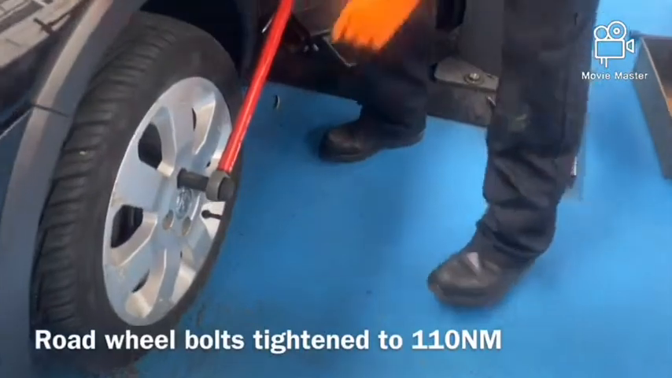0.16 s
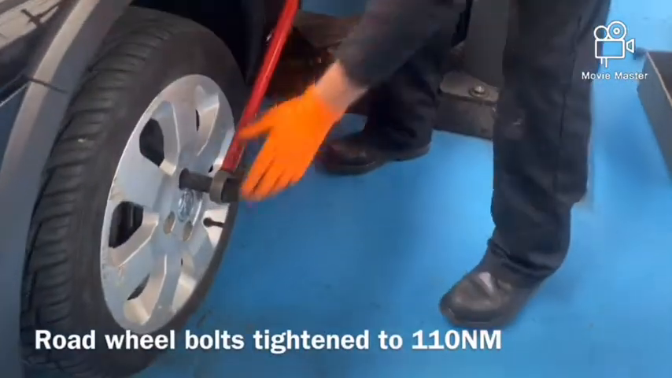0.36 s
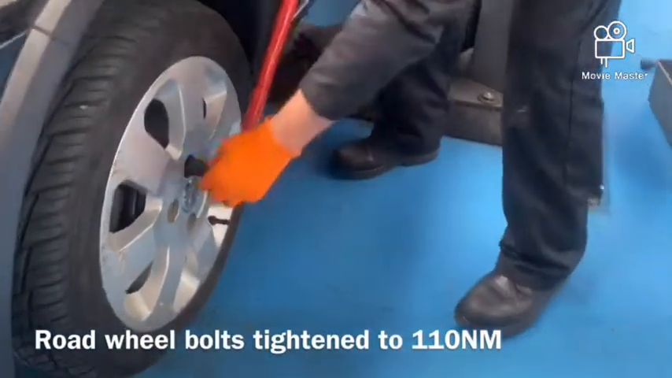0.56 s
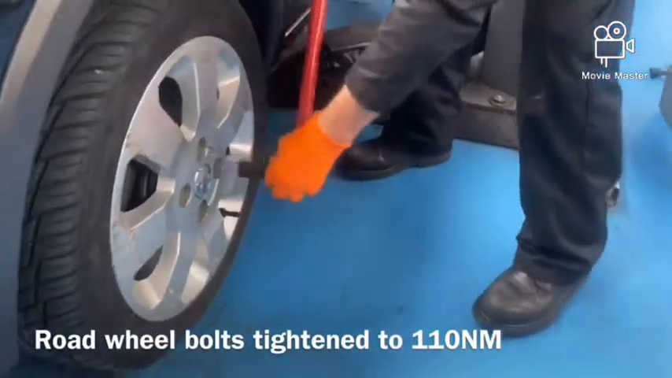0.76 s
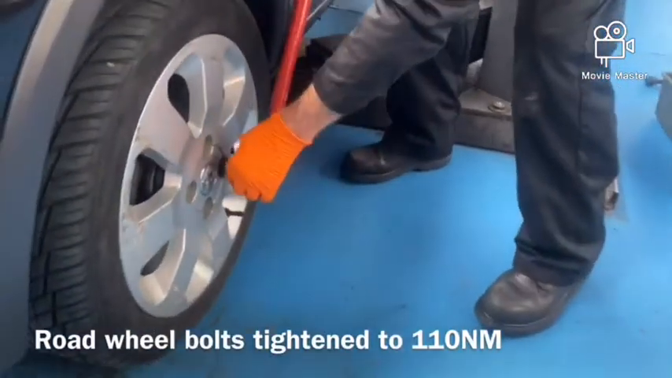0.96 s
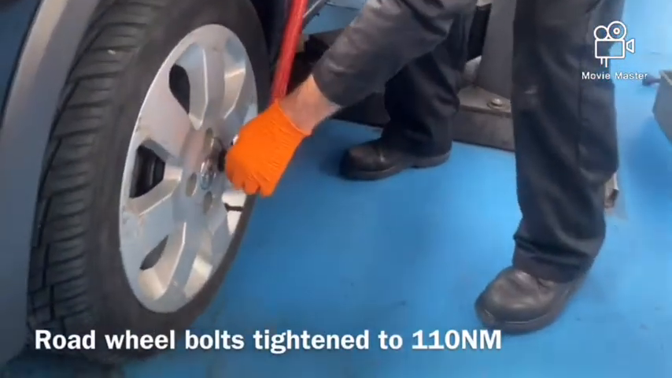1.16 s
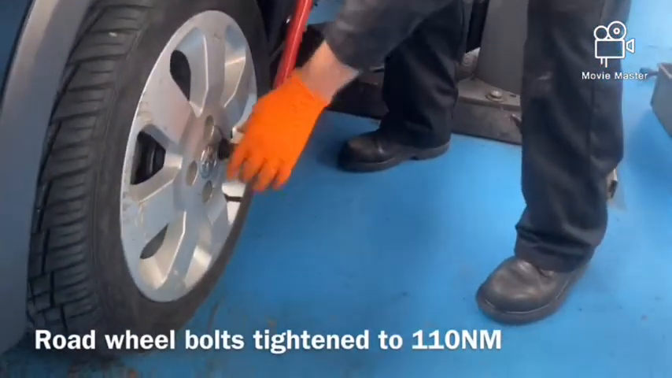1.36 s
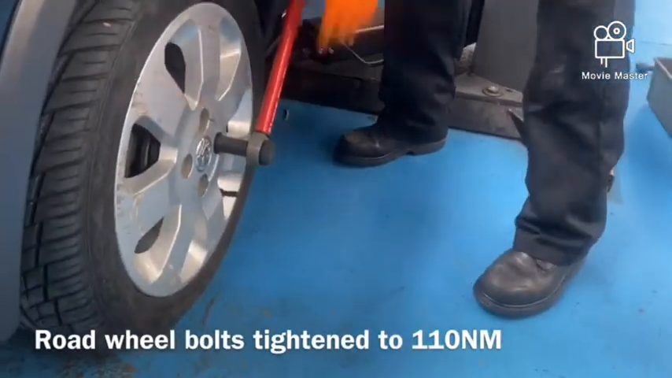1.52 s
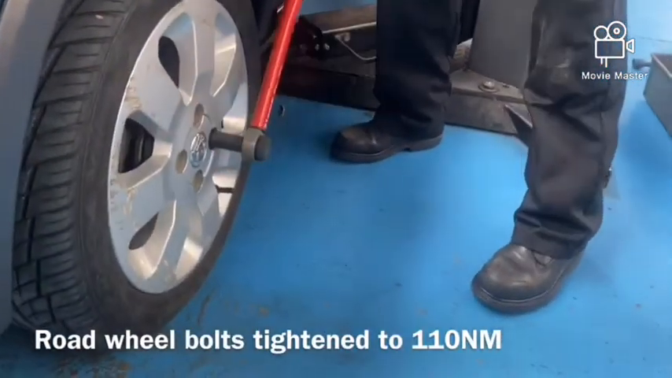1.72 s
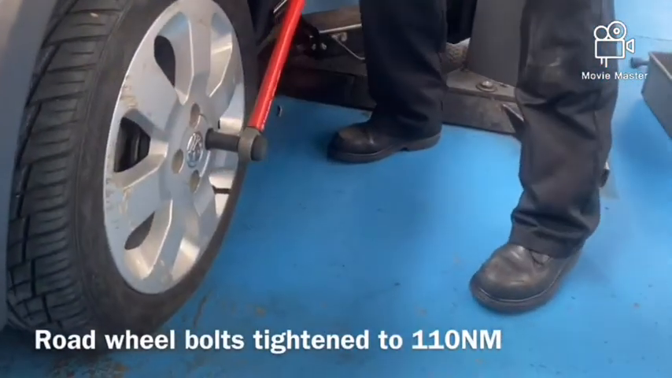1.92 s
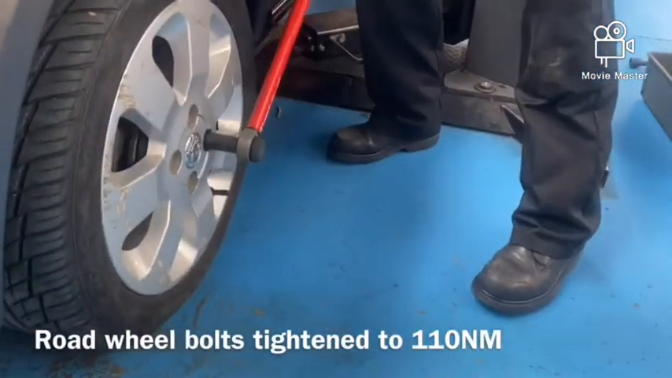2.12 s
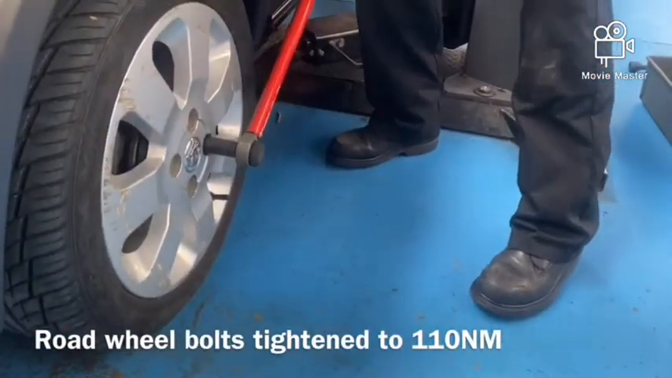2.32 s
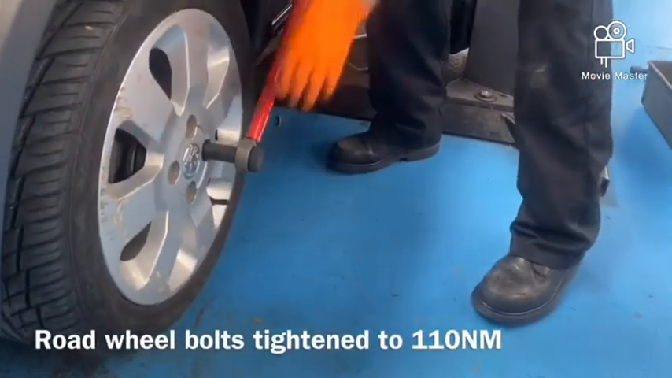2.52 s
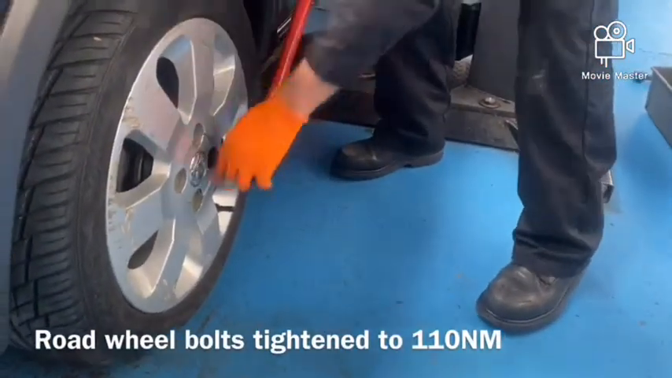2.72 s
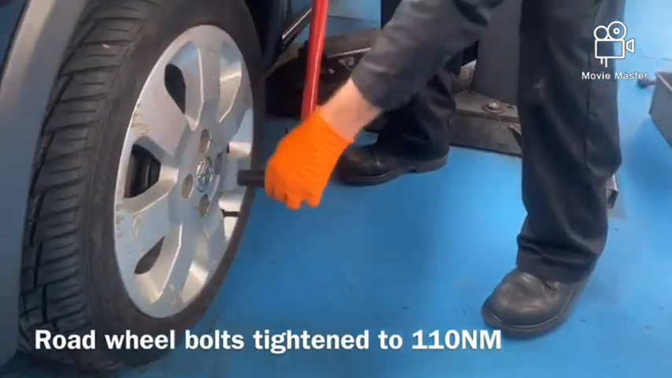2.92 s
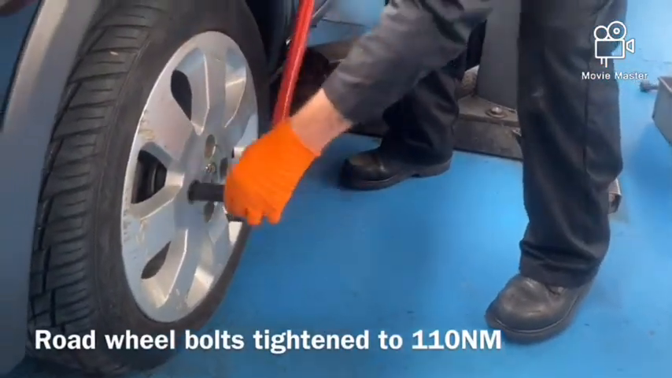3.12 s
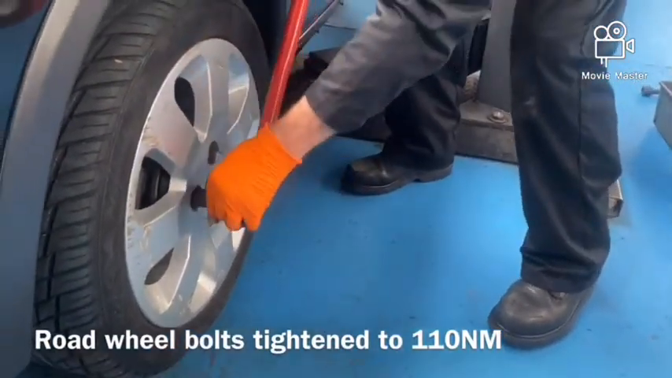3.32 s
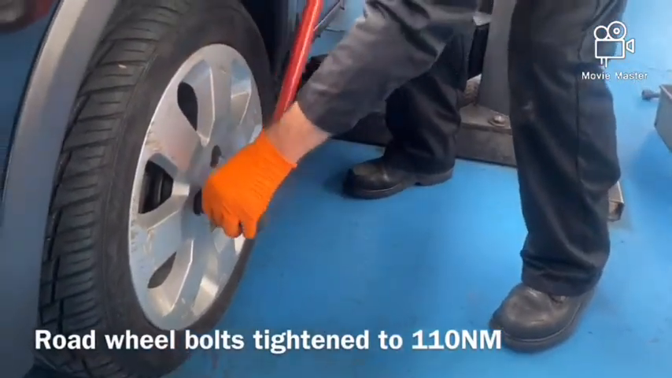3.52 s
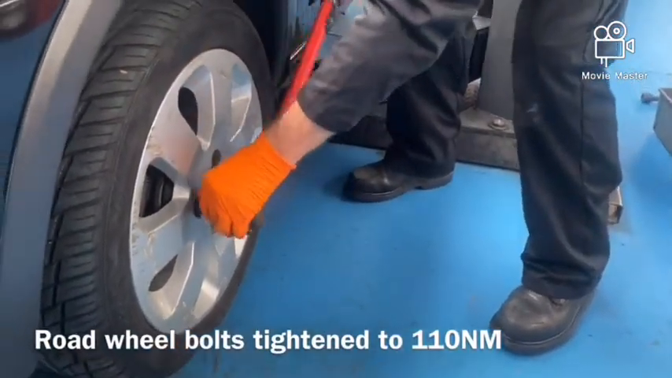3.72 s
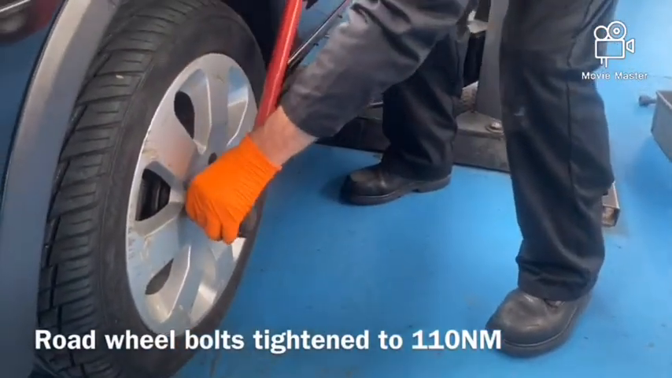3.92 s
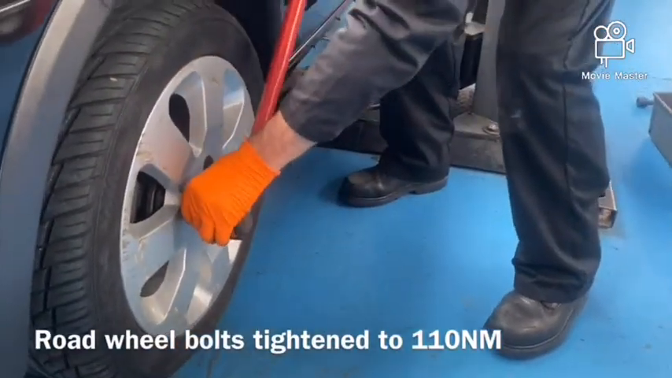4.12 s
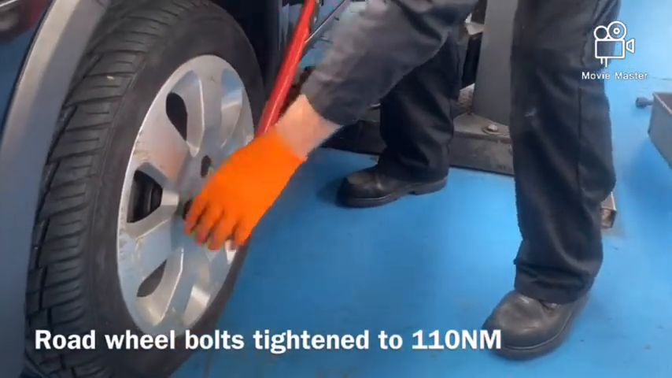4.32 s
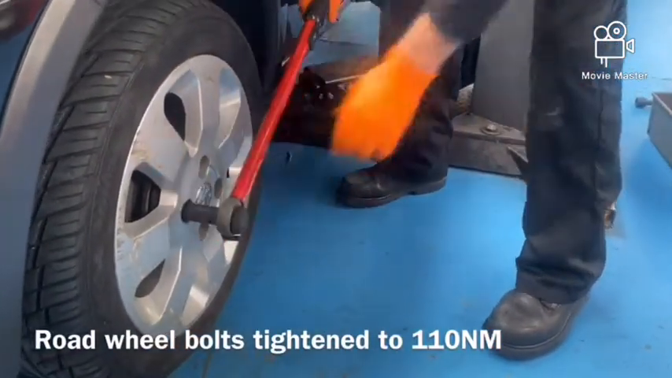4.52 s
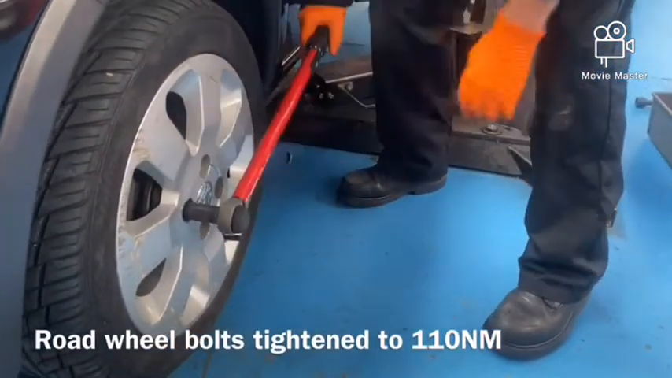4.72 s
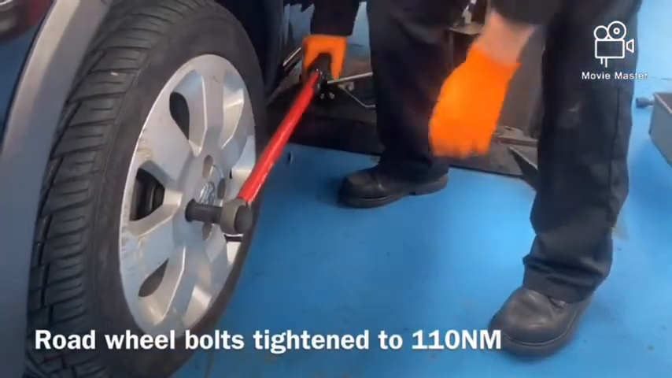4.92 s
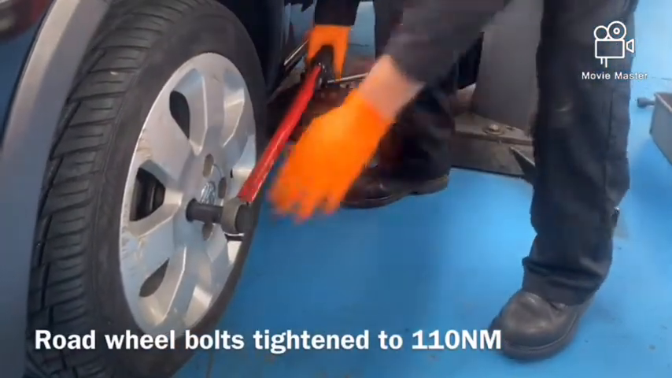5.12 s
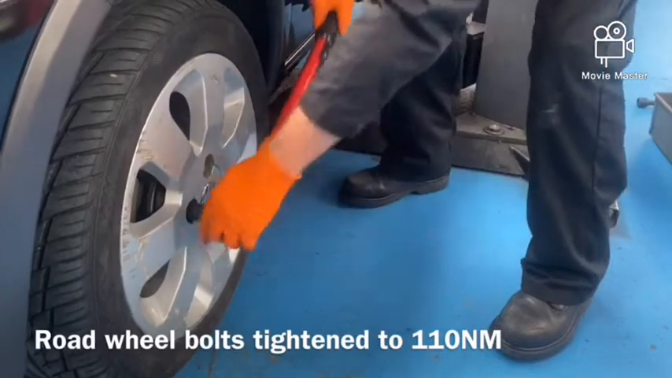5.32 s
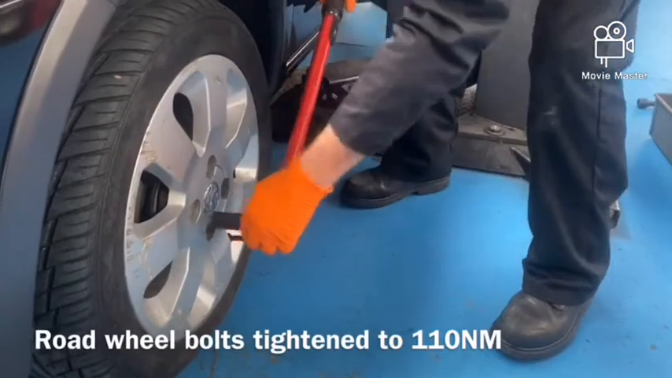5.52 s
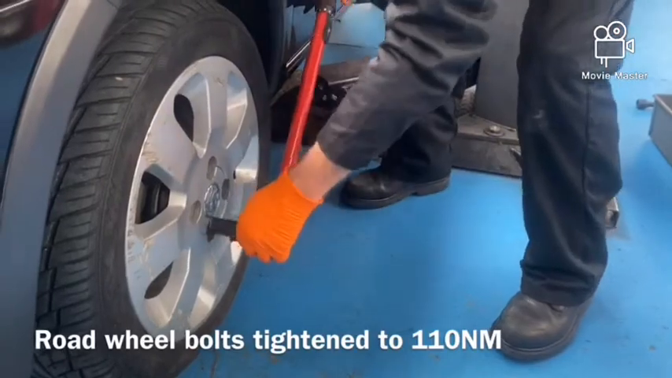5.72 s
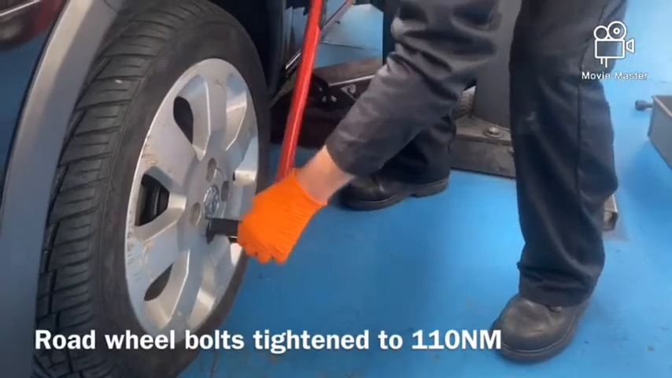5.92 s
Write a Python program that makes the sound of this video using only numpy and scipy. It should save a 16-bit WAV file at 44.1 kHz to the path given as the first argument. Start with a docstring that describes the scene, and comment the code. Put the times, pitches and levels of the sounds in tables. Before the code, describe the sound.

In a reverberant garage, metal socket knocks and faint rattles lead to two sharp wrench clicks, each followed by a slightly softer snap.

```python
"""A click-type torque wrench tightens wheel bolts in a reverberant vehicle workshop.
At the set torque it breaks with a crack (filtered, quickly damped noise) and a short hoot of its tube
(beating modes), then snaps back as the pull eases. In between, the socket knocks, rattles and clinks on
the next bolt (noise cracks and decaying partials). Soft thuds of falling pitch, faint air noise and a
wavering low rumble (filtered noise) lie underneath."""
import sys
import numpy as np
from scipy import signal
from scipy.fft import rfft, irfft
from scipy.io import wavfile

SR = 44100
rng = np.random.default_rng(int(sys.argv[2]) if len(sys.argv) > 2 else 0)


def generate_wav(signal):
    """Clip the signal to [-1, 1] and save it as 16-bit WAV at the path in sys.argv[1]."""
    frames = np.transpose(np.atleast_2d(signal))
    scaled = np.clip(frames, -1, 1) * 32767
    pcm = np.round(scaled).astype(np.int16)
    wavfile.write(sys.argv[1], SR, pcm)


N = 262836
TIME = np.arange(N) / SR
RING_TIME = TIME[:49152]   # time axis of a ring or hall response, s
CRACK_SIZE = 8192   # samples
SIDES = np.array([[1], [-1]])   # left, right

# All levels in the tables are relative: each source adds its own gains.
# spectrum of the air noise: (frequency [Hz], level [dB])
AIR_SPECTRUM = [(110, -34.5), (180, -8), (243, -12.5), (301, -5), (448, -13), (538, -8), (615, -15),
                (4140, -45.5), (6930, -15), (9500, -63.5), (12400, -79.5), (20900, -120)]
# balance of the air noise: (frequency [Hz], left over right [dB])
AIR_BALANCE = [(200, 6.5), (500, 2.5), (1500, -6), (6500, -14.5)]
# spectrum of the rumble: (frequency [Hz], level [dB])
RUMBLE_SPECTRUM = [(15, -14), (30, -9.5), (48, 1.5), (68, 4), (100, -8), (150, -13.5), (250, -34.5),
                   (600, -73.5)]
# course of the rumble: (time [s], level [dB])
RUMBLE_COURSE = [(0.0, -51.5), (0.68, -54.5), (1.01, -52.5), (1.79, -61.5), (2.14, -54), (2.57, -54.5),
                 (4.05, -60), (4.25, -53.5), (4.5, -59), (5.96, -58.5)]
# reverberation bands of the workshop:
# (frequency [Hz], level [dB], t60 [s], left over right [dB], left-right likeness [-1 to 1])
HALL_BANDS = [(120, 16, 1.2, -4.5, -0.52), (285, 0.5, 3.1, 1.5, -0.58), (500, 3, 1.23, 9.5, -0.04),
              (670, -3.5, 1.53, -0.5, -0.47), (1100, -8, 1.5, -7.5, -0.37),
              (2160, -5.5, 1.415, -4.5, -0.31), (2920, 2.5, 1.185, -5.5, -0.2),
              (4790, 0.5, 1.29, -14, -0.48), (6540, 6.5, 1.03, -25, -0.33), (7410, 4.5, .85, -10, 0)]
# soft thuds that fall in pitch: (time [s], level [dB], starting pitch [Hz])
THUD_EVENTS = [(.024, -36.5, 323), (0.099, -34.5, 196), (.259, -38, 347), (0.344, -29.5, 188),
               (.403, -31, 245), (0.452, -34.5, 340), (1.157, -38.5, 88), (1.567, -43.5, 143),
               (1.891, -33.5, 108.6), (1.946, -37.5, 265), (2.149, -33, 111), (2.604, -40.5, 162),
               (2.722, -36.5, 274), (2.8, -36.5, 185), (3.608, -39, 274), (4.246, -36, 164),
               (4.376, -36, 373), (4.399, -37, 96.4)]
# the socket is wiggled onto a bolt: (start [s], end [s], level [dB])
WIGGLE_SPANS = [(3.017, 3.072, -44), (3.151, 3.199, -46), (3.339, 3.384, -52), (3.685, 3.781, -50.5),
                (5.55, 5.599, -49)]
# the socket knocks on bolt and wheel: (time [s], level [dB], crack t60 [s], share passed to wheel [0-1])
KNOCK_EVENTS = [(.305, -49, .07, .1), (.493, -37, 0.03, 0.07), (.599, -38, 0.0091, 0),
                (0.7503, -37.5, 0.05, 0.5), (.785, -25.5, 0.046, 0.97), (.817, -29.5, .028, 0),
                (1.15, -55, 0.1, 1), (2.81, -53.5, 0.065, .1), (2.9807, -29.5, 0.041, 0),
                (3.008, -40, 0.034, 0.15), (3.0871, -38.5, .011, 0), (3.137, -36.5, 0.058, 0.4),
                (3.329, -47, 0.13, 1), (3.44, -40.5, 0.047, 0.2), (3.67, -36, 0.045, 0.14),
                (3.756, -47, 0.11, 0), (4.107, -44.5, 0.084, 0), (4.474, -71, 0.027, 0.3),
                (5.303, -31.5, 0.025, 0), (5.513, -40, 0.046, 0.1), (5.543, -40.5, 0.037, 0.35)]
# light clinks of the socket: (time [s], level [dB], ring level [dB], how far it is seated [0-1])
CLINK_EVENTS = [(.996, -52.5, 8, 0.83), (3.329, -43.5, 8.5, 0), (3.371, -48.5, 8, 0.3),
                (3.661, -41, -6, 0.6), (3.683, -48.5, 11, 0.86), (3.846, -48.5, -3, 0.9),
                (5.655, -48.5, -7, 0.55), (5.704, -47, -4, .5), (5.72, -45, -3, 0.46),
                (5.795, -47, -2.5, 0.8)]
# the wrench breaks: (time [s], level [dB])
BREAK_EVENTS = [(1.9861, -15.5), (4.8023, -15.5)]
# the wrench snaps back: (time [s], level [dB]); a negative time leaves only the later part audible
RESET_EVENTS = [(-.14, -19.5), (2.3122, -20.5), (5.0267, -22)]
# colour of each contact, before its tilt: (frequency [Hz], level [dB])
KNOCK_SPECTRUM = [(150, -15.5), (350, -8), (500, -2.5), (780, -0.5), (1000, 0.5), (1200, 1), (1500, -7.5),
                  (1930, -2), (2450, -15.5), (3500, -7), (5200, -12), (7200, -11), (8200, -25),
                  (9400, -66.5)]
CLINK_SPECTRUM = [(150, -13), (1000, -9), (2500, -11.5), (3500, -8.5), (5400, -3), (6700, 3.5),
                  (7400, -7.5), (8400, -30), (9400, -28), (12000, -35.5), (13000, -39)]
BREAK_SPECTRUM = [(150, -31.5), (280, -10.5), (400, -7), (900, -8.5), (1400, -8), (1800, 0), (2450, -17.5),
                  (3200, -4), (3700, -12), (4500, 0), (5700, 0.5), (7300, -1.5), (8300, -6.5), (9400, -43)]
RESET_SPECTRUM = [(150, -9.5), (250, -6), (360, -1.5), (500, 1), (850, -4), (1170, 1), (1450, -7.5),
                  (1900, -0.5), (2450, -13), (3200, -7), (5000, -4.5), (7400, -0.5), (8300, -9),
                  (9400, -45.5)]
# balance of the direct crack: (frequency [Hz], left over right [dB])
DIRECT_BALANCE = [(250, -20), (470, 20), (700, -8.5), (1200, -5.5), (2000, -14), (3200, -0.5), (4400, -10),
                  (6000, -13.5), (8000, 0.5)]
# modes of the alloy wheel: (frequency [Hz], level [dB], t60 [s])
WHEEL_MODES = [(958, 2, .075), (968, -22, .55), (1030, -2, .04), (1095, -6, .08), (1830, -12, .09),
               (1950, -8, .07), (3500, -20, .3)]
# ring of the steel: (frequency [Hz], level [dB], t60 [s])
STEEL_MODES = [(3430, -35, .6), (4355, -32, .45), (5090, -25, .4), (5475, -22, .5), (5900, -24, .45),
               (6255, -25, .6), (6335, -25, .6), (6683, -25, .7), (6987, -23, .7), (7215, -21, .6),
               (7335, -17, .9)]
# the socket rings lower when loose, higher when seated: (frequency [Hz], level [dB], t60 [s])
LOOSE_MODES = [(6395, -2, .15), (6550, -7, .35), (6600, -6, .4), (6683, 0, .45), (6747, -7, .35)]
SEATED_MODES = [(6988, -8, .5), (7135, 0, .45), (7220, -1, .5), (7335, -6, .6)]
# hollow modes shaken by the break and by the snap back:
# (frequency [Hz], level [dB], t60 [s], left over right [dB])
TUBE_MODES = [(500, -13, .11, 14), (652, 0, .115, -1), (672, -1, .105, -1), (705, -11, .05, -1),
              (1600, -9, .025, -9), (1850, -9, .03, -9)]
SNAP_MODES = [(267, -4, 0.078, -5), (508, -0.5, 0.074, 4.5), (1142, 10.5, 0.03, -6), (1260, -1, 0.038, -5)]

AIR_DB = -65
RUMBLE_WAVER_DB, RUMBLE_WAVER_HZ = 3, 8   # rms depth, upper rate
THUD_CYCLES = 3.12   # time scale of the swell, in cycles of the starting pitch
# Per contact: brightness [dB per octave], t60 of the crack [s], echo level [dB, relative]
KNOCK_TILT_DB, KNOCK_T60_S, KNOCK_HALL_DB = 0.6, 0.041, -2   # a typical knock
CLINK_TILT_DB, CLINK_T60_S, CLINK_HALL_DB = 0.5, 0.042, -4.5
BREAK_TILT_DB, BREAK_T60_S, BREAK_HALL_DB = -0.5, 0.034, -1.5
RESET_TILT_DB, RESET_T60_S, RESET_HALL_DB = 1.1, 0.04, -1
KNOCK_RISE_S = 0.0017   # of a typical knock
BRIGHTER_DB = 0.5   # tilt added for each halving of a knock's length
WHEEL_DB = 5.5   # the wheel at full share
CUTOFF_HZ = 12400


def from_db(db):
    """Logarithmic level: decibels to amplitude gain."""
    return 10 ** (np.asarray(db) / 20)


def rms_one(x):
    """Normalisation: scale to rms 1."""
    return x / np.sqrt(np.mean(x ** 2) + 1e-20)


def at_hz(points, hz):
    """Linear interpolation of a table on a log-frequency axis."""
    points = np.array(points)
    return np.interp(np.log(hz), np.log(points[:, 0]), points[:, 1])


def bins(size):
    """Discrete Fourier frequencies, none below 1 Hz so that logarithms exist."""
    return np.maximum(np.fft.rfftfreq(size, 1 / SR), 1)


def pan(db):
    """Constant-power panning: left and right gains for a level difference."""
    gains = from_db(SIDES * db / 2)
    return gains / np.sqrt(np.mean(gains ** 2, axis=0))


def shaped(x, gain):
    """Spectral filtering: multiply by a gain per frequency."""
    return irfft(rfft(x) * gain, x.shape[-1])


def dying(t60, size=None):
    """Exponential damping: a fall of 60 dB in t60 seconds."""
    return np.exp(-np.log(1000) * RING_TIME[:size] / max(t60, 1e-3))


def stereo_noise(likeness, size):
    """Interchannel correlation: white noise partly shared by both sides."""
    mid, side = rng.standard_normal((2, size))
    likeness = np.clip(likeness, -1, 1)
    shared = np.sqrt((1 + likeness) / 2) * mid
    return shared + np.sqrt((1 - likeness) / 2) * side * SIDES


def add(out, start_s, sound):
    """Superposition: mix a sound in at a time, its last tenth faded out."""
    at = round(start_s * SR)
    sound = sound * np.minimum(np.linspace(10, 0, sound.shape[-1]), 1)
    first, last = max(at, 0), min(at + sound.shape[-1], N)
    out[:, first:last] += sound[..., first - at:last - at]


def background(rumble_gain_db=4.5, rumble_balance_db=-4.0):
    """Stationary filtered noise for the air, amplitude-modulated low noise for the rumble."""
    hz = bins(N)
    air_gain = from_db(at_hz(AIR_SPECTRUM, hz)) * pan(at_hz(AIR_BALANCE, hz))
    air = rms_one(shaped(stereo_noise(0.3, N), air_gain))
    rumble_gain = from_db(at_hz(RUMBLE_SPECTRUM, hz)) * pan(rumble_balance_db)
    rumble = rms_one(shaped(stereo_noise(0.46, N), rumble_gain))
    waver = rms_one(shaped(rng.standard_normal(N), np.exp(-(hz / RUMBLE_WAVER_HZ) ** 2)))
    course_db = np.interp(TIME, *np.transpose(RUMBLE_COURSE))
    level_db = course_db + rumble_gain_db + RUMBLE_WAVER_DB * waver
    return from_db(AIR_DB) * air + from_db(level_db) * rumble


def workshop(early_db=11.0, early_t60=0.26, build_s=0.015):
    """Reverberation by bands: strong early echoes from car and floor, then a long tail."""
    hz, out = bins(len(RING_TIME)), 0
    centres = np.log([row[0] for row in HALL_BANDS])
    for share, (_, db, t60, balance_db, likeness) in zip(np.eye(len(HALL_BANDS)), HALL_BANDS):
        band = np.sqrt(np.interp(np.log(hz), centres, share))   # the powers of all bands sum to 1
        decay = np.hypot(dying(t60), from_db(early_db) * dying(early_t60))
        noise = shaped(stereo_noise(likeness, len(RING_TIME)), band)
        out = out + from_db(db) * pan(balance_db) * decay * noise
    return out * (1 - np.exp(-RING_TIME / build_s))


def thuds(rest_hz=62, fall_s=0.0093, balance_db=-1, rustle_db=-13, rustle_t60=0.29):
    """Frequency glide: a soft swell sinks into the bass in a dull rustle; deep starts swell for longer."""
    out, freq = np.zeros((2, N)), bins(len(RING_TIME))
    for start_s, db, hz in THUD_EVENTS:
        pitch = rest_hz + (hz - rest_hz) * np.exp(-RING_TIME / fall_s)
        tone = np.sin(2 * np.pi * np.cumsum(pitch) / SR)
        age = RING_TIME * hz / THUD_CYCLES
        swell = 2 * age * np.exp(-age ** 2)
        dull = freq / (1 + (freq / hz) ** 5)
        rustle = rms_one(shaped(stereo_noise(1.0, len(RING_TIME)), dull))
        rustle = from_db(rustle_db) * rustle * np.tanh(2 * age) * dying(rustle_t60)
        add(out, start_s, from_db(db) * pan(balance_db) * (swell * tone + rustle))
    return out


def voicing(colour, tilt_db, size):
    """Spectral envelope of a contact, closed at both ends, with mean power 1."""
    hz = bins(size)
    ends = (hz > colour[0][0] / 2) / np.hypot(1, (hz / colour[-1][0]) ** 20)
    return rms_one(from_db(at_hz(colour, hz) + tilt_db * np.log2(hz / 1000)) * ends)


def contact(colour, tilt_db, t60, hall_db, hall, rise_s=0.0011, crack_db=5, send_db=-13, chatter_db=-0.5):
    """Impact of steel on steel: dense, quickly damped modes as chattering noise, and their echo."""
    hz = bins(CRACK_SIZE)
    gain = voicing(colour, tilt_db, CRACK_SIZE) * pan(at_hz(DIRECT_BALANCE, hz))
    crack = shaped(stereo_noise(0, CRACK_SIZE), gain)
    slow = rms_one(shaped(rng.standard_normal(CRACK_SIZE), hz < 350))
    chatter = rms_one(from_db(chatter_db * slow))
    attack = 1 - np.exp(-(RING_TIME[:CRACK_SIZE] / rise_s) ** 2)
    out = from_db(send_db + hall_db) * shaped(hall, voicing(colour, tilt_db, len(RING_TIME)))
    out[:, :CRACK_SIZE] += from_db(crack_db) * crack * chatter * attack * dying(t60, CRACK_SIZE)
    return out


def ringing(modes, balance_db, rise_s=0.003):
    """Modal vibration: decaying partials of a struck metal part."""
    out = 0
    for hz, db, t60 in modes:
        phase = rng.uniform(0, 2 * np.pi, (2, 1))
        out = out + from_db(db) * dying(t60) * np.sin(2 * np.pi * hz * RING_TIME + phase)
    return out * pan(balance_db) * (1 - np.exp(-RING_TIME / rise_s))


def hollow(modes, echo_db, hall, rise_s=0.0081, feed_t60=0.083, wall_s=0.028):
    """Beating of close modes, which swell and cancel; then reflection, as the walls return the note."""
    note = 0
    for hz, db, t60, balance_db in modes:
        partial = dying(t60) * np.sin(2 * np.pi * hz * RING_TIME)
        note = note + from_db(db) * pan(balance_db) * partial
    note = note * (1 - np.exp(-RING_TIME / rise_s))
    echo = signal.fftconvolve(note * dying(feed_t60), hall.mean(axis=0)[None], axes=1)
    echo = np.pad(echo, ((0, 0), (round(abs(wall_s) * SR), 0)))[:, :len(RING_TIME)]
    return note + from_db(echo_db) * rms_one(echo)


def rattle(hall, spread_db=3, tick_t60=0.013, tilt_db=2.0, hall_db=-8, count=3):
    """Random repeated impact: tiny ticks while the socket feels for the flats of the bolt."""
    out = np.zeros((2, N))
    for start, end, db in WIGGLE_SPANS:
        for when, strength in rng.uniform(0, 1, (count, 2)):
            tick = contact(KNOCK_SPECTRUM, tilt_db, tick_t60, hall_db, hall)
            tick_db = db + spread_db * (2 * strength + 1)
            add(out, start + when * (end - start), from_db(tick_db) * tick)
    return out


def knock(t60, hall):
    """Contact duration sets bandwidth: brief is sharp and bright, glancing soft, dull and more echoing."""
    length = max(t60, 1e-3) / KNOCK_T60_S
    tilt_db = KNOCK_TILT_DB - BRIGHTER_DB * np.log2(length)
    hall_db = KNOCK_HALL_DB + 10 * np.log10(length)   # echo energy grows with the crack's length
    return contact(KNOCK_SPECTRUM, tilt_db, t60, hall_db, hall, rise_s=KNOCK_RISE_S * length)


def socket(hall, knock_ring_db=-10, ring_balance_db=-12, wheel_balance_db=-5, clink_ring_db=-5):
    """Coupled modes: knocks share their force with the wheel; seating shifts the ring of the clinks."""
    out = np.zeros((2, N))
    steel = from_db(knock_ring_db) * ringing(STEEL_MODES, ring_balance_db)
    wheel = from_db(WHEEL_DB) * ringing(WHEEL_MODES, wheel_balance_db)
    loose, seated = ringing(LOOSE_MODES, ring_balance_db), ringing(SEATED_MODES, ring_balance_db)
    for start_s, db, t60, share in KNOCK_EVENTS:
        sound = knock(t60, hall) + steel + np.clip(share, 0, 1) * wheel
        add(out, start_s, from_db(db) * sound)
    for start_s, db, ring_db, seating in CLINK_EVENTS:
        seating = np.clip(seating, 0, 1)
        ring = from_db(clink_ring_db + ring_db) * ((1 - seating) * loose + seating * seated)
        clink = contact(CLINK_SPECTRUM, CLINK_TILT_DB, CLINK_T60_S, CLINK_HALL_DB, hall)
        add(out, start_s, from_db(db) * (clink + ring))
    return out


def wrench(hoot_db=1, snap_db=-3, break_ring_db=-3, reset_ring_db=2, ring_balance_db=-12):
    """Impact and tube resonance: the break cracks and hoots, the snap back cracks with a higher knock."""
    out = np.zeros((2, N))
    for start_s, db in BREAK_EVENTS:
        hall = workshop()   # a fresh random echo pattern for each break
        ring = from_db(break_ring_db) * ringing(STEEL_MODES, ring_balance_db)
        crack = contact(BREAK_SPECTRUM, BREAK_TILT_DB, BREAK_T60_S, BREAK_HALL_DB, hall, rise_s=0.0013)
        add(out, start_s, from_db(db) * (crack + ring))
        hoot = hollow(TUBE_MODES, echo_db=-39.5, hall=hall)
        add(out, start_s + 0.00095, from_db(db + hoot_db) * hoot)   # just after the crack
    hall = workshop()   # one echo pattern for all snaps back
    for start_s, db in RESET_EVENTS:
        ring = from_db(reset_ring_db) * ringing(STEEL_MODES, ring_balance_db)
        snap = from_db(snap_db) * hollow(SNAP_MODES, echo_db=-38.5, hall=hall)
        crack = contact(RESET_SPECTRUM, RESET_TILT_DB, RESET_T60_S, RESET_HALL_DB, hall)
        add(out, start_s, from_db(db) * (crack + ring + snap))
    return out


def scene():
    """Superposition of rumble, thuds, socket and wrench in the hall."""
    hall = workshop()
    return background() + thuds() + rattle(hall) + socket(hall) + wrench()


def record(dry):
    """Soft saturation rounds the highest peaks; an elliptic low-pass cuts the top steeply."""
    rounded = dry / (1 + (dry / 0.66) ** 8) ** (1 / 8)
    low_pass = signal.ellip(10, 0.1, 80, CUTOFF_HZ, fs=SR, output="sos")
    return signal.sosfilt(low_pass, rounded)


dry = scene()
out = record(dry)
generate_wav(out)
```